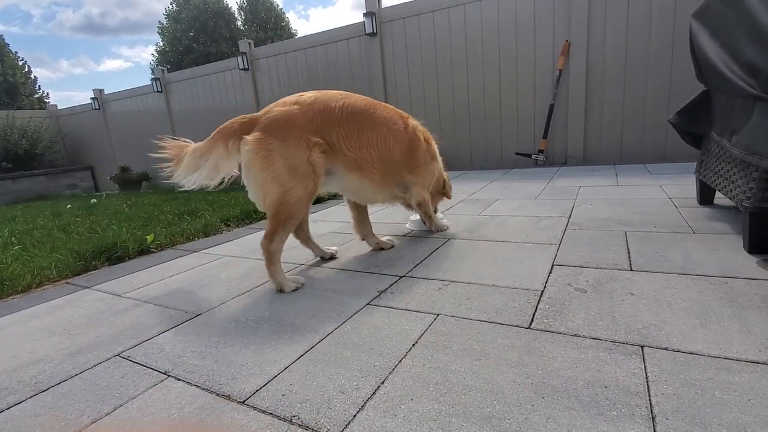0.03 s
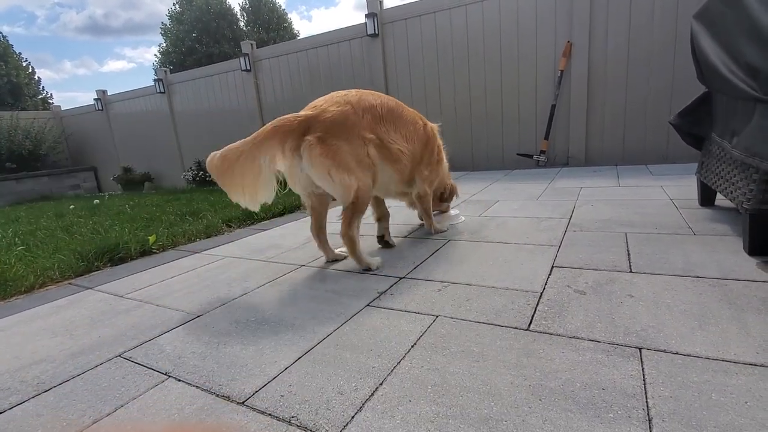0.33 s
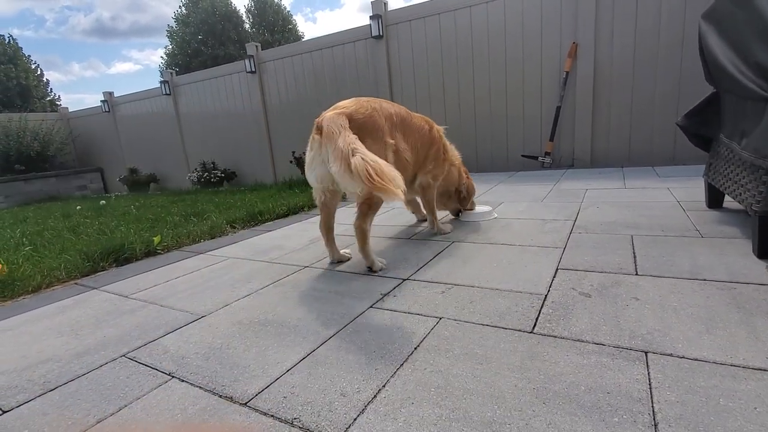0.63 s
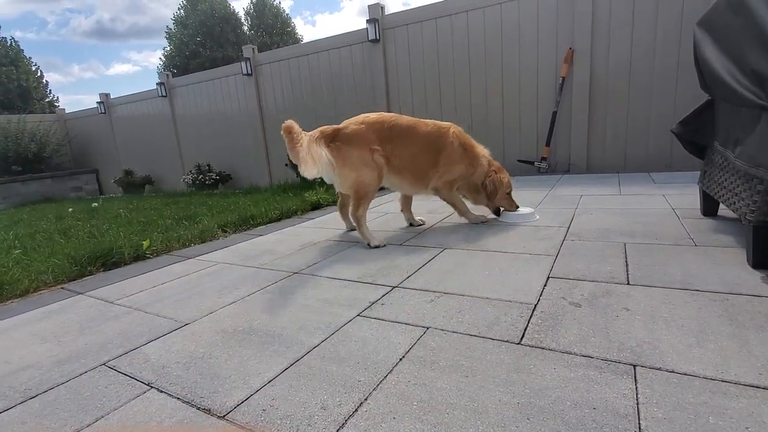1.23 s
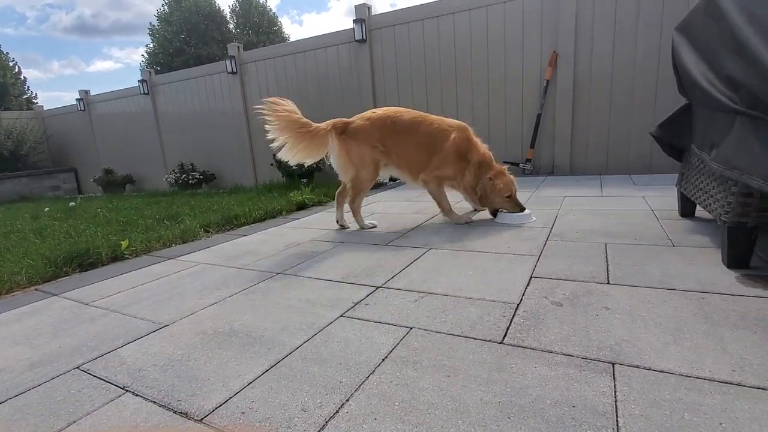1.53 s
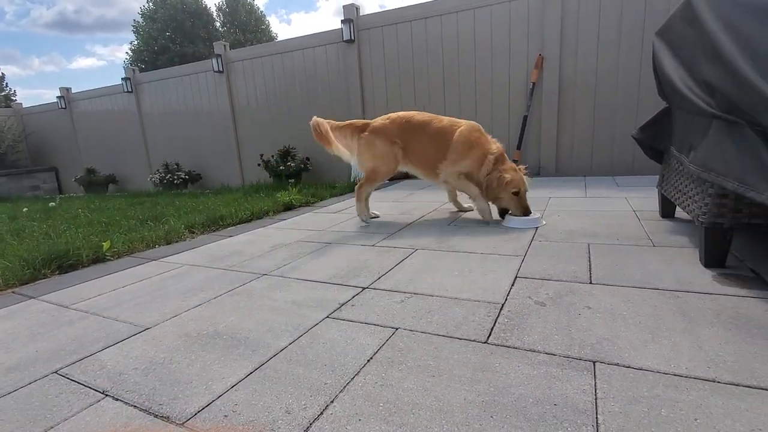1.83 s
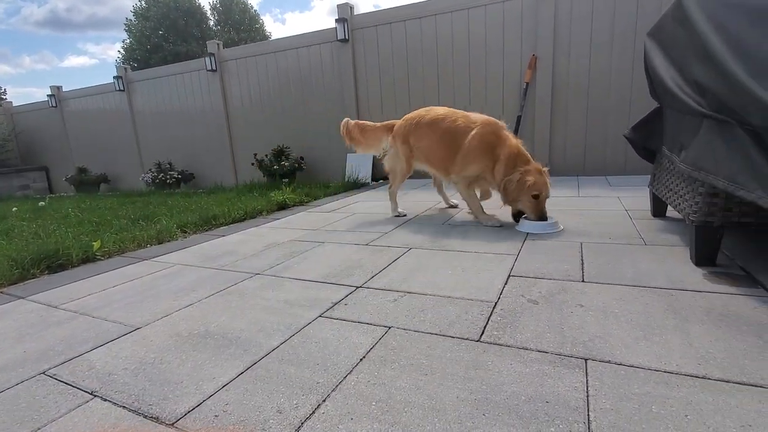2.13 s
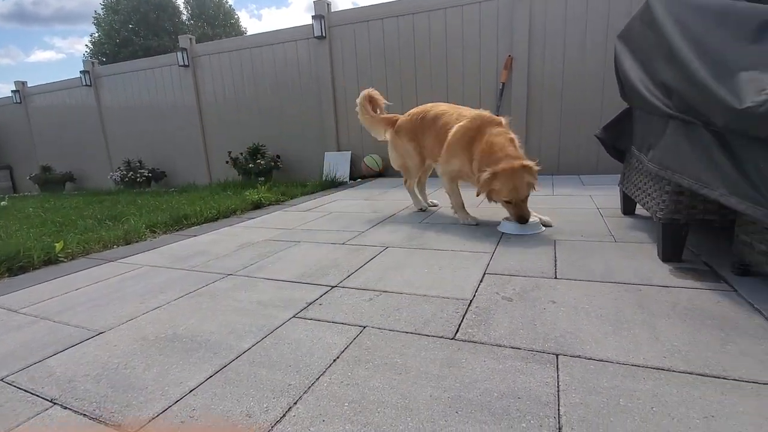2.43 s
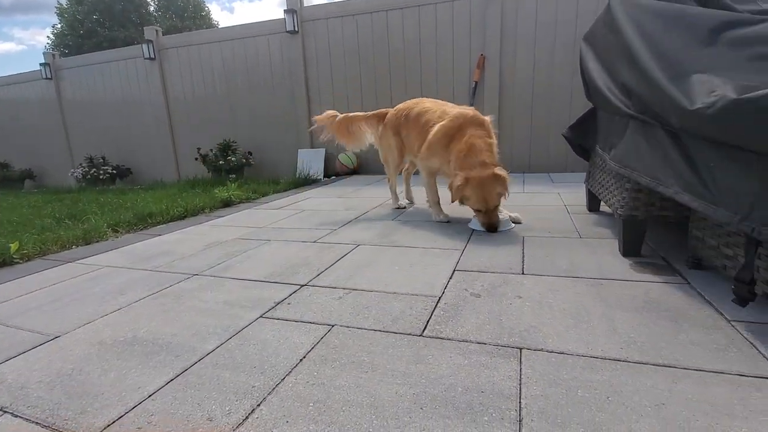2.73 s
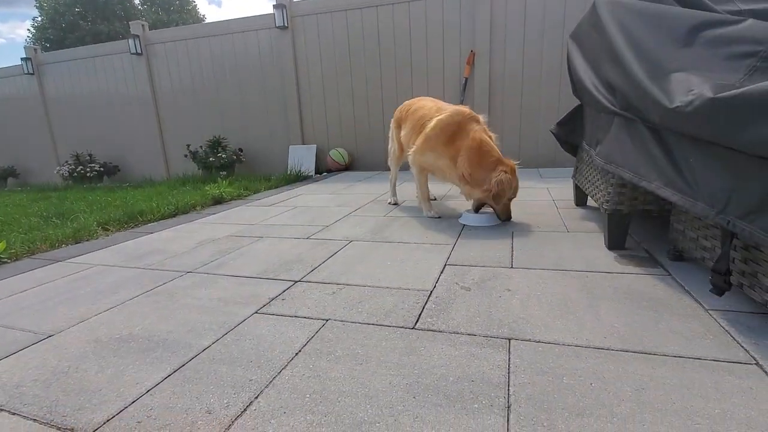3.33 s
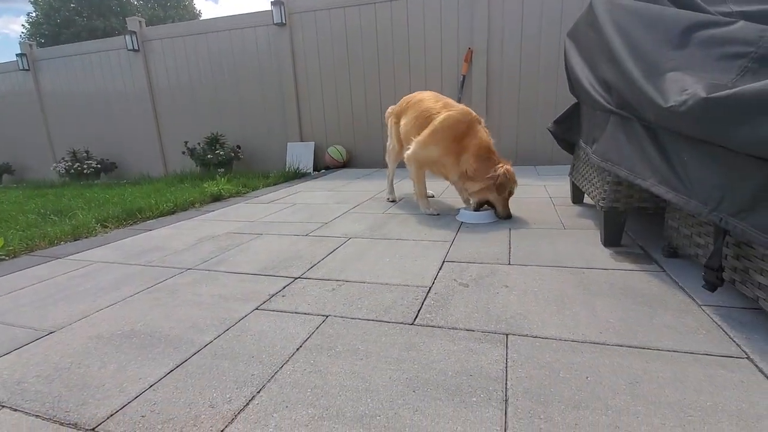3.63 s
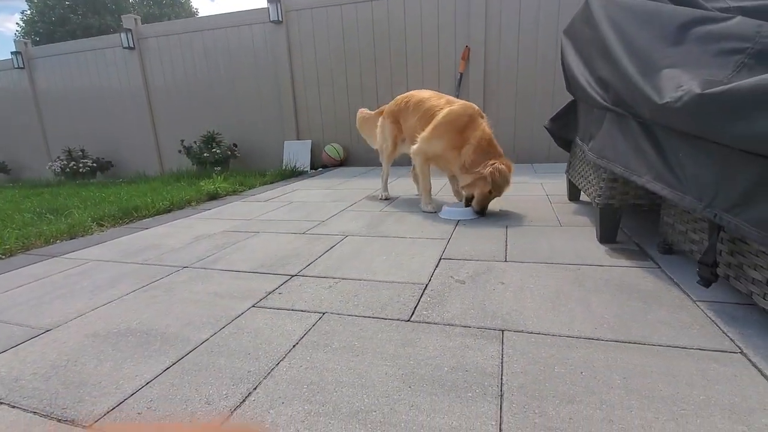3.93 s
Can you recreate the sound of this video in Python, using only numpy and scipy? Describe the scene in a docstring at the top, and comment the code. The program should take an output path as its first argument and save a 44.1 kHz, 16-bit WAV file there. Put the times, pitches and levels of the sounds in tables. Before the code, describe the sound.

A dish scrapes over stone pavers from the start, pushed by a dog in rough, gritty bursts with hollow knocks and a ringing rim. At about 2.5 seconds the scraping stops, followed by a clack, a short scuff and soft muzzle taps on the dish. It slides briefly again near 3.8 seconds. Faint insects and a low distant rumble lie underneath, outdoors.

```python
"""On a garden patio, a dog shoves its dish over stone pavers a few metres away.
Tiny slips thump the hollow body and the rim rings, while grit rasps the walls and sand crackles.
The dish bites into the stone at each shove, knocks, booms and judders; then it rests, is nudged by
the muzzle and slides briefly again. Insects sing over a low distant rumble, and the paving and
the fence scatter the sound of the dish."""
import sys
import numpy as np
from scipy import signal
from scipy.fft import rfft, irfft, next_fast_len
from scipy.io import wavfile
from scipy.ndimage import map_coordinates

SR = 44100
rng = np.random.default_rng(int(sys.argv[2]) if len(sys.argv) > 2 else 0)


def persist_wave(psi):
    """Save psi, clipped to +-1, as 16-bit WAV."""
    counts = np.round(np.clip(psi, -1, 1) * 32767).astype(np.int16)
    wavfile.write(sys.argv[1], SR, np.atleast_2d(counts).T)


N = 176400
TIME = np.arange(N) / SR


def amp(db):
    """Decibels to gain."""
    return 10 ** (np.asarray(db) / 20)


def unit(x):
    """Scale to rms 1."""
    return x / np.sqrt(np.mean(x ** 2) + 1e-20)


def automation(points):
    """A curve through (seconds, value) points."""
    return np.interp(TIME, *np.transpose(points))


def along(points, hz):
    """Read (Hz, value) points on a log frequency axis."""
    freqs, values = np.transpose(points)
    return np.interp(np.log(hz + 1), np.log(freqs + 1), values)


def wobble(rate):
    """A smooth random curve with `rate` knots a second."""
    return map_coordinates(rng.standard_normal(8192), [TIME * rate], mode="wrap")


def filtered(x, response):
    """Equalise x with a complex response of frequency."""
    size = next_fast_len(N + SR // 2)
    return irfft(rfft(x, size) * response(np.fft.rfftfreq(size, 1 / SR)), size)[..., :N]


def resonate(x, spectrum, size=4096):
    """Let x ring a body of the given spectrum (minimum phase, unit energy)."""
    cepstrum = irfft(np.log(amp(along(spectrum, np.fft.rfftfreq(size, 1 / SR)))))
    cepstrum[1:size // 2] *= 2
    cepstrum[size // 2 + 1:] = 0
    impulse = irfft(np.exp(rfft(cepstrum)))
    return signal.fftconvolve(x, impulse / np.linalg.norm(impulse))[:N]


def contacts(per_s, spread_db):
    """Random impulses of uneven size."""
    size = amp(spread_db * np.clip(rng.standard_normal(N), -2, 2)) * rng.choice([-1, 1], N)
    return size * (rng.random(N) < per_s / SR)


def resonance(hz, width_hz):
    """A narrow resonance kept ringing by noise, rms 1."""
    phase = 2 * np.pi * np.cumsum(hz + np.zeros(N)) / SR
    pole = np.exp(-np.pi * width_hz * 2 / SR)
    a, b = signal.lfilter([1], np.poly([pole, pole]), rng.standard_normal((2, N)))
    return unit(a * np.cos(phase) + b * np.sin(phase))


def dying_tones(rows, attack_s):
    """Sines that swell quickly and ring out."""
    out = np.zeros(N)
    for start, hz, db, t60 in rows:
        age = np.maximum(TIME - start, 0)
        envelope = amp(db - 60 * age / t60) * (1 - np.exp(-age / attack_s))
        out += envelope * np.sin(2 * np.pi * hz * age)
    return out


def stereo_noise(spectrum, likeness):
    """A noise bed of rms 1, wider where left and right are less alike."""
    def mid_side(hz):
        angle = np.arccos(np.clip(along(likeness, hz), -1, 1)) / 2
        return amp(along(spectrum, hz)) * [np.cos(angle), np.sin(angle)]
    mid, side = filtered(rng.standard_normal((2, N)), mid_side)
    return unit(np.array([mid + side, mid - side]))


# Tone of the far rumble and of the air with its insects. Each row: frequency in Hz, level in dB.
FAR_SPECTRUM = [(20, -21), (40, -10.5), (60, 2), (100, -5.5), (160, -13.5), (300, -21.5), (800, -27.5),
                (2000, -82)]
AIR_SPECTRUM = [(100, -5), (400, -2.5), (900, -7), (2000, -15.5), (3200, -25), (4600, -24.5), (5600, -20),
                (6500, -16), (7500, -24.5), (8600, -24), (9500, -32.5), (16000, -34)]
# Their stereo image. Each row: frequency in Hz, left-right likeness from 0 to 1.
FAR_LIKENESS = [(40, 0.67), (120, 0.95)]
AIR_LIKENESS = [(200, 0.86), (1000, 0.0099), (3000, .1), (9000, 0)]
# The far rumble's fader. Each row: time in seconds, level in dB.
FAR_LEVEL = [(0, -46.5), (2.75, -43), (3.05, -50), (4, -48.5)]
def garden(air_db=-58, insect_db=-76, chirps_per_s=18.5, chirp_peak_s=2.46):
    """The bed: far rumble, air with an insect chorus, and one nearer insect pulsing."""
    far = amp(automation(FAR_LEVEL)) * stereo_noise(FAR_SPECTRUM, FAR_LIKENESS)
    chirps = unit((.5 + .5 * np.cos(2 * np.pi * chirps_per_s * (TIME - chirp_peak_s))) ** 2)
    song = np.array([resonance(hz=8720, width_hz=140) for _ in range(2)])
    air = amp(air_db) * stereo_noise(AIR_SPECTRUM, AIR_LIKENESS)
    return far + air + amp(insect_db) * chirps * song


# Light sliding, one list per run of the dish. Each row: time in seconds, rim level in dB.
SLIDES = [
    [(0.0, -39.5), (0.476, -39.5), (0.802, -35.5), (0.86, -44), (1.096, -35.5), (1.325, -35.5), (1.37, -58)],
    [(1.44, -56), (1.516, -39), (1.785, -37.5), (1.82, -58)],
    [(1.855, -60), (1.885, -36), (2.1, -35.5), (2.44, -39), (2.465, -66)],
    [(3.82, -92), (3.856, -37.5), (4.0, -39)],
]
# The dish's foot bites into the stone.
# Each row: moment of greatest force, rise and fall in seconds, rumble in dB, grinding in dB.
SHOVES = [(.01, 0.06, 0.017, -27, -38.5), (0.114, 0.028, 0.0058, -26.5, -31),
          (0.199, .05, 0.026, -31.5, -34.5), (.26, 0.032, 0.0073, -26, -38),
          (.335, 0.04, 0.083, -31.5, -54), (.475, 0.034, 0.0075, -32, -36.5),
          (0.521, 0.032, 0.018, -25, -42), (0.583, 0.047, 0.039, -22, -28), (0.614, 0.032, 0.016, -21, -43),
          (.692, 0.061, 0.035, -23.5, -29), (0.782, 0.046, 0.029, -25.5, -28),
          (0.989, 0.018, 0.0053, -37, -44), (1.036, 0.0098, 0.017, -27, -42), (1.1, 0.062, 0.044, -36, -30),
          (1.177, 0.055, 0.036, -27.5, -28.5), (1.303, 0.077, 0.022, -30.5, -30),
          (1.543, 0.026, 0.016, -18, -41), (1.633, 0.038, 0.037, -33.5, -29),
          (1.737, 0.028, 0.03, -21.5, -24), (1.988, 0.018, 0.006, -30, -40.5),
          (2.05, 0.047, 0.033, -28, -25.5), (2.14, 0.011, 0.022, -34, -33), (2.161, 0.015, 0.024, -9, -34),
          (2.216, 0.028, 0.043, -30.5, -37), (2.3, 0.039, 0.036, -24, -32),
          (2.434, 0.0072, 0.011, -15, -34), (3.875, 0.023, 0.073, -31.5, -41.5),
          (3.98, 0.082, 0.044, -32.5, -36.5)]
def pushing(rumble_over_rim_db=4.5, grind_over_rim_db=-6.5, hiss_db=-57, hiss_until_s=2.8):
    """Envelopes of rumble, rim and grinding: light sliding plus the swell of each shove."""
    runs_db = [np.interp(TIME, *np.transpose(run), left=-140, right=-140) for run in SLIDES]
    rim_db = np.max(runs_db, axis=0)
    rumble_power = amp(rim_db + rumble_over_rim_db) ** 2
    grind_power = amp(rim_db + grind_over_rim_db) ** 2
    # a faint steady gritty hiss under and just after the scraping
    grind_power += amp(hiss_db) ** 2 * (TIME < hiss_until_s)
    for peak, rise, fall, rumble_db, grind_db in SHOVES:
        swell = np.exp(-((TIME - peak) / np.where(TIME < peak, rise, fall)) ** 2)
        rumble_power += (amp(rumble_db) * swell) ** 2
        grind_power += (amp(grind_db) * swell) ** 2
    return np.sqrt(rumble_power), amp(rim_db), np.sqrt(grind_power)


# Tone of the dish's hollow body. Each row: frequency in Hz, level in dB.
BODY_SPECTRUM = [(60, -28), (130, -15.5), (190, -3.5), (260, -7), (330, 1.5), (420, 0), (520, 3), (620, 1),
                 (720, 0.5), (850, -11), (980, -7), (1130, -19.5), (1500, -54), (2500, -52.5)]
# The body's groan. Each row: time in seconds, pitch in Hz, weight in the rumble in dB.
GROAN = [(0, 540.9, -11), (.4, 399.5, -3), (0.779, 479.9, -4), (1.08, 310, -8), (1.23, 739.6, -8),
         (1.32, 738.6, 1.5), (1.45, 339.6, 0.5), (2.16, 399.9, -2), (2.32, 658.3, -2), (2.441, 424.6, -7)]
def body_rumble(thump_weight_db=-3):
    """Slips thump the body, whose strongest resonance shifts as the dish tilts."""
    thumps = unit(resonate(contacts(per_s=1500, spread_db=4), BODY_SPECTRUM))
    times, pitch_hz, weight_db = np.transpose(GROAN)
    groan = resonance(np.interp(TIME, times, pitch_hz), width_hz=110)
    thump_weight, groan_weight = amp(thump_weight_db), amp(np.interp(TIME, times, weight_db))
    return (thump_weight * thumps + groan_weight * groan) / np.hypot(thump_weight, groan_weight)


def rim_ring(hz=1447, wander_hz=14.9, flutter_db=2.35):
    """Sliding keeps the rim ringing, unsteady in level and pitch."""
    flutter = amp(flutter_db * wobble(29.9))
    return flutter * resonance(hz + wander_hz * wobble(25), width_hz=83)


def grains(spectrum, catch, width):
    """Stone grains radiate unevenly: the share `width` of their power differs between the sides."""
    shared, left, right = [
        unit(resonate(catch * contacts(per_s=7000, spread_db=5.5), spectrum)) for _ in range(3)]
    return np.sqrt(1 - width) * shared + np.sqrt(width) * np.array([left, right])


# Tone of the rasped walls and of crushed sand. Each row: frequency in Hz, level in dB.
WALL_SPECTRUM = [(400, -36), (800, -2), (1150, -16.5), (1500, -3.5), (1800, -9), (2100, -8), (2480, -3.5),
                 (2700, -6), (3080, -4), (3450, -6.5), (3850, -2.5), (4250, -11.5), (5100, -15.5),
                 (6100, -17), (7200, -25.5), (9500, -29), (16000, -64)]
SAND_SPECTRUM = [(3000, -27), (6500, -27), (9400, -1), (12500, -3.5), (15800, -6.5)]
# Loose sand along the dish's path. Each row: time in seconds, sand boost in dB.
LOOSE_SAND = [(0, -8.5), (.38, 5), (.58, -4), (.68, 6), (.78, -3.5), (1.75, 0.5), (2.4, 0.5)]
def grinding(force, rasp_db=2.5, chip_db=-6, sand_db=-14.5, hard_push_db=-31, catch_db=2.5):
    """Fine grit and coarse chips rasp the walls unevenly while sand is crushed underneath."""
    catch = amp(catch_db * wobble(260))
    chips = amp(chip_db) * unit(resonate(contacts(per_s=90, spread_db=1.5), WALL_SPECTRUM))
    rasp = force * amp(rasp_db) * (grains(WALL_SPECTRUM, catch, width=0.36) + chips)
    crush = (force / amp(hard_push_db)) ** 1.1  # sand gains on the rasp as the push gets harder
    sand_level = amp(hard_push_db + sand_db + automation(LOOSE_SAND))
    return rasp + sand_level * crush * grains(SAND_SPECTRUM, catch, width=0.95)


# The dish catches and almost stops. Each entry: time in seconds.
STALL_TIMES = [0.129, 1.572, 2.006, 2.122]
def scrape(judder_share=0.85, stall_half_width_s=0.0075, stall_db=-13):
    """The dish slides on stone: rumble, judder, rim and grinding, all dipping at each stall."""
    rumble_level, rim_level, grind_level = pushing()
    stutter, takeover = judder()
    rumble = rumble_level * body_rumble() * (1 - judder_share * takeover)
    rim = rim_level * rim_ring()
    stalled = sum(np.exp(-((TIME - at) / stall_half_width_s) ** 2) for at in STALL_TIMES)
    return amp(stall_db * stalled) * (rumble + stutter + rim + grinding(grind_level))


def blow(db, chatter_t60_s, chatter_db):
    """One impact: an impulse and a short dying chatter."""
    age = np.arange(SR // 8) / SR
    chatter = rng.standard_normal(len(age)) * amp(-60 * age / chatter_t60_s)
    impact = (age == 0) + amp(chatter_db) * chatter / np.linalg.norm(chatter)
    return amp(db) * np.sqrt(SR / 200) * impact


# Tone of a hard contact. Each row: frequency in Hz, level in dB.
CLICK_SPECTRUM = [(400, -30), (1200, -9), (1750, 0.5), (2300, -4.5), (3000, -4), (7000, -23), (16000, -21)]
# The dish knocks against the stone. Each row: start in seconds, thud in dB, click in dB.
STONE_KNOCKS = [(.143, -24.5, -33.5), (.567, -22, -37), (.699, -18.5, -35), (1.299, -27, -30),
                (1.449, -37, -59), (2.015, -24, -24), (2.178, -16.5, -43), (2.307, -21.5, -33.5),
                (2.359, -25, -27.5), (2.379, -24, -35), (2.394, -32.5, -32.5), (2.584, -42.5, -27),
                (2.691, -35.5, -41), (3.47, -36, -46.5)]
def knocks(rows, thud_cutoff_hz=735):
    """Each knock thuds softly through the hollow body and clicks at the point of contact."""
    thuds, clicks = np.zeros((2, N + SR))
    for start, thud_db, click_db in rows:
        thud = blow(thud_db, chatter_t60_s=0.038, chatter_db=0)
        click = blow(click_db, chatter_t60_s=0.0066, chatter_db=-2)
        thuds[round(start * SR):][:len(thud)] += thud
        clicks[round(start * SR):][:len(click)] += click
    softened = filtered(thuds[:N], lambda hz: 1 / (1 + 1j * hz / thud_cutoff_hz))
    return resonate(softened, BODY_SPECTRUM) + resonate(clicks[:N], CLICK_SPECTRUM)


# Low booms. Each row: start in seconds, pitch in Hz, level in dB, seconds to fall 60 dB.
BASE_BOOMS = [(.325, 188, -29, 0.32), (.609, 249, -11.5, 0.054), (1.048, 210, -18, 0.066),
              (1.092, 226, -11.5, 0.042), (1.515, 274.6, -24.5, 0.23), (1.583, 244, -20, .06)]
def base_booms():
    """The dish rocks over a bump and its base booms."""
    return dying_tones(BASE_BOOMS, attack_s=0.0062)


# Single grains give way. Each row: start in seconds, level in dB.
GRAIN_CRACKS = [(.773, -26), (1.108, -25.5), (2.209, -35), (2.396, -37.5)]
def grain_cracks(t60_s=0.011):
    """A grain bursts under the dish's foot with a short bright tick."""
    bursts = sum(amp(db - 60 * abs(TIME - at) / t60_s) * (TIME >= at) for at, db in GRAIN_CRACKS)
    return resonate(bursts * rng.standard_normal(N), SAND_SPECTRUM)


# Bursts of judder. Each row: start in seconds, length in seconds, slips per second, level in dB.
JUDDERS = [(1.061, 0.042, 142, -29), (1.508, 0.05, 295, -28.5), (1.697, 0.053, 310, -24.5),
           (2.138, 0.058, 390, -27), (2.421, 0.023, 400, -23.5)]
def judder(jitter=0.077, spread_db=4.0, fade_s=0.016):
    """The dish sticks and slips almost regularly; returns the buzz and how far it has taken over."""
    buzz, takeover = np.zeros((2, N))
    for start, length, rate, db in JUDDERS:
        gate = np.clip(np.minimum(TIME - start, start + length - TIME) / fade_s + .5, 0, 1)
        slip_count = np.floor(np.cumsum(rate * (1 + jitter * wobble(150))) / SR)
        slips = np.diff(slip_count, prepend=0) * amp(spread_db * rng.standard_normal(N))
        softened = filtered(slips - slips.mean(), lambda hz: 1 / (1 + 1j * hz / rate))
        buzz += amp(db) * gate * unit(resonate(softened, BODY_SPECTRUM))
        takeover += gate
    return buzz, takeover


# Touches on the resting dish. Each row: start in seconds, level in dB.
MUZZLE_NUDGES = [(2.553, -43.5), (2.701, -39), (2.779, -37.5), (2.796, -32), (2.915, -45.5), (3.039, -47),
                 (3.148, -46), (3.192, -40), (3.198, -36), (3.414, -39.5), (3.483, -40), (3.634, -48),
                 (3.731, -41.5), (3.841, -36)]
def muzzle_nudges(click_offset_db=-13, cutoff_hz=3620):
    """The soft muzzle taps the dish: knocks with a dull click."""
    taps = knocks([(start, db, db + click_offset_db) for start, db in MUZZLE_NUDGES])
    return signal.lfilter(*signal.butter(2, cutoff_hz, fs=SR), taps)


# A thin ring. Each row: start in seconds, pitch in Hz, level in dB, seconds to fall 60 dB.
PING = [(2.584, 2095, -55, 1)]
def ping():
    """The dish rings on faintly after a sharp clack."""
    return dying_tones(PING, attack_s=0.00093)


# Tone of a scuff. Each row: frequency in Hz, level in dB.
SCUFF_SPECTRUM = [(450, 6), (1000, 0), (3900, -1), (7000, -13.5), (12000, -3.5), (16000, -21)]
# Soft scuffs. Each row: start in seconds, length in seconds, level in dB, top edge in Hz.
SCUFFS = [(2.602, 0.11, -45.5, 13800), (3.45, 0.21, -59, 3030)]
def scuffs(attack_s=.008, t60_s=0.2, flutter_db=2.9):
    """Dense tiny contacts, probably of paws, make gritty hisses that hold and die away."""
    out = np.zeros(N)
    for start, length, db, top_hz in SCUFFS:
        age = TIME - start
        envelope = np.clip(age / attack_s, 0, 1) * amp(-60 * np.maximum(age - length, 0) / t60_s)
        grit = resonate(contacts(per_s=9000, spread_db=3.0), SCUFF_SPECTRUM)
        hiss = filtered(grit, lambda hz: 1 / np.hypot(1, (hz / top_hz) ** 4))
        out += amp(db + flutter_db * wobble(90)) * envelope * unit(hiss)
    return out


def reflections(x, t60_s):
    """Diffuse stereo tails, crossfaded so that the answer changes as the dish moves."""
    age, out = np.arange(int(SR * .3)) / SR, np.zeros((2, N))
    moments = np.linspace(0, N / SR, num=17)
    for moment in moments:
        tail = rng.standard_normal((2, len(age))) * amp(-60 * age / t60_s)
        crossfade = np.sqrt(np.clip(1 - abs(TIME - moment) / moments[1], 0, 1))
        out += signal.oaconvolve(x * crossfade, tail / np.linalg.norm(tail[0]), axes=1)[:, :N]
    return out


# The dish crosses to the side. Each row: time in seconds, lead of the right channel in milliseconds.
RIGHT_LEAD = [(0, 0.057), (2.3, .15), (4, 0.094)]
# The dish's pan. Each row: frequency in Hz, left over right in dB.
PAN = [(300, -0.2), (750, 0), (1400, 3.5), (2400, -0.5), (4400, -0.5), (12000, -0.5)]
# Returns from paving and fence. Each row: frequency in Hz, level against the dry dish in dB.
PAVING_RETURN = [(200, -22.5), (700, -9.5), (1300, -9.5), (2400, -3.5), (3400, -8), (5200, -3), (12000, 0)]
FENCE_RETURN = [(1400, -18.5), (2500, -13.5)]
def patio(dish):
    """The dish's sound arrives on the right first; paving and fence answer."""
    lead_samples = automation(RIGHT_LEAD) * SR / 1000
    direct = np.array([map_coordinates(channel, [np.arange(N) + side * lead_samples / 2])
                       for channel, side in zip(dish, (-1, 1))])
    scatter = lambda hz: amp(along(PAVING_RETURN, hz))
    pan = lambda hz: amp(np.outer([.5, -.5], along(PAN, hz)))
    paving = filtered(reflections(dish, t60_s=.075), scatter)
    near = filtered(direct + paving, lambda hz: pan(hz) / np.hypot(1, scatter(hz)))
    fence = filtered(reflections(dish, t60_s=.35), lambda hz: amp(along(FENCE_RETURN, hz)))
    return near + fence


def scene():
    """Dish and scuffs on the patio, over the garden bed."""
    foreground = scrape() + knocks(STONE_KNOCKS) + muzzle_nudges() + grain_cracks() + scuffs()
    return patio(foreground + base_booms() + ping()) + garden()


def record(dry, top_hz=15900):
    """A brick-wall low-pass takes off the very top."""
    return filtered(dry, lambda hz: hz < top_hz)


dry = scene()
out = record(dry)
persist_wave(out)
```